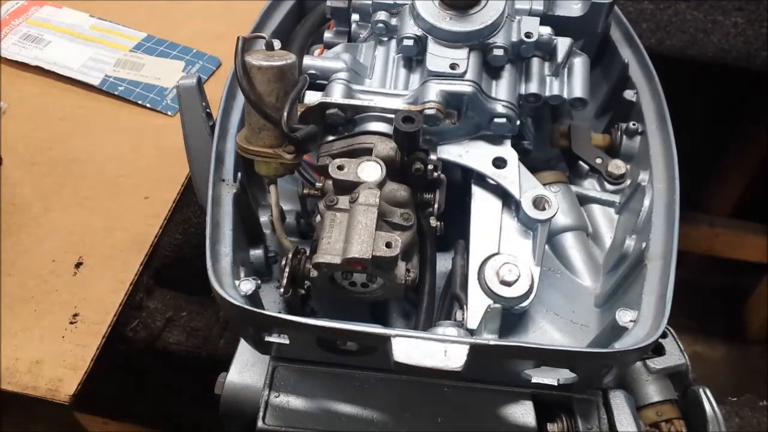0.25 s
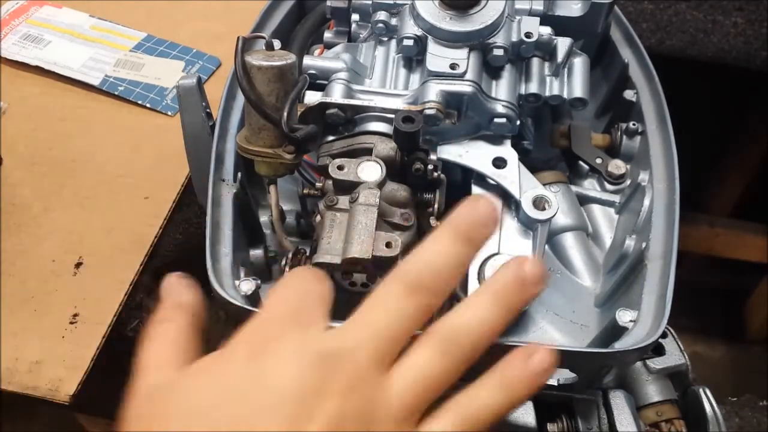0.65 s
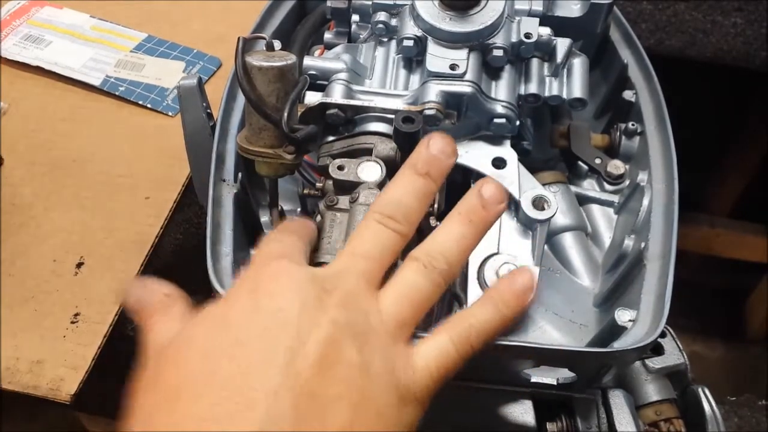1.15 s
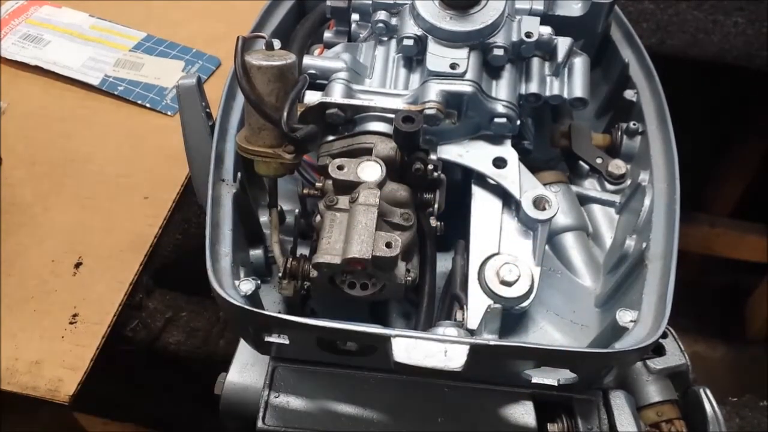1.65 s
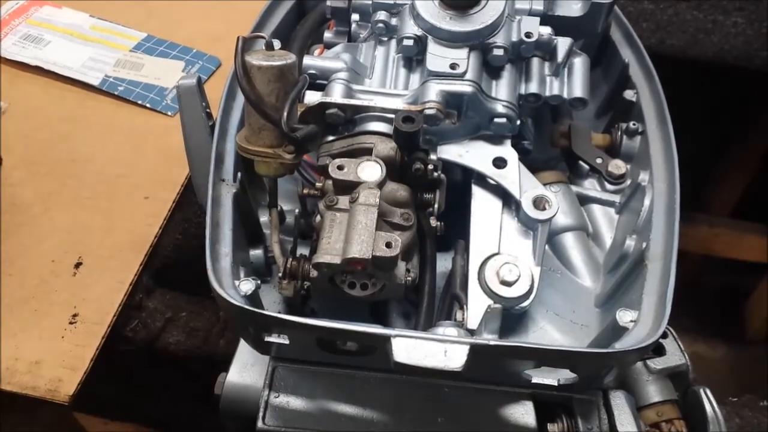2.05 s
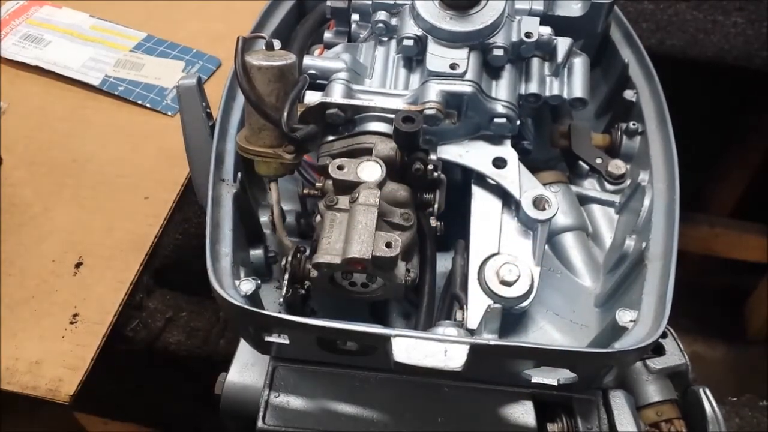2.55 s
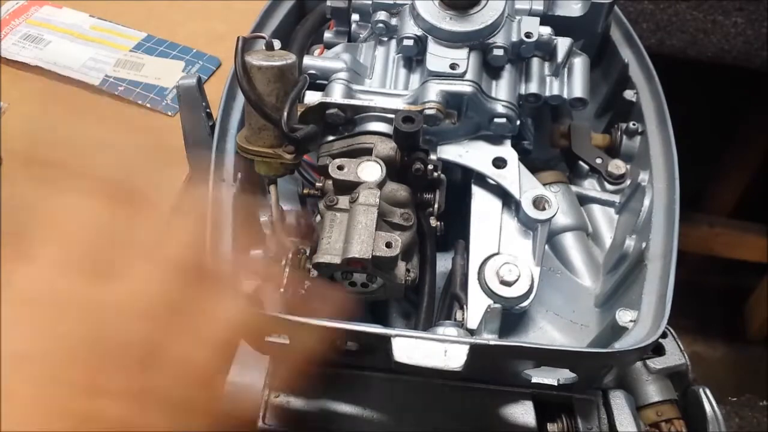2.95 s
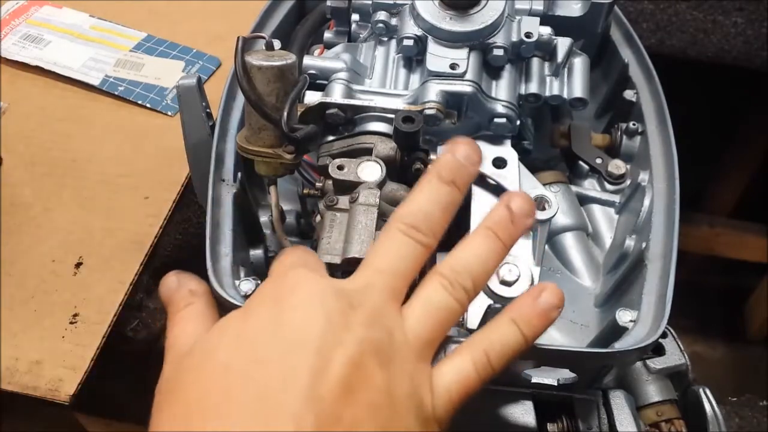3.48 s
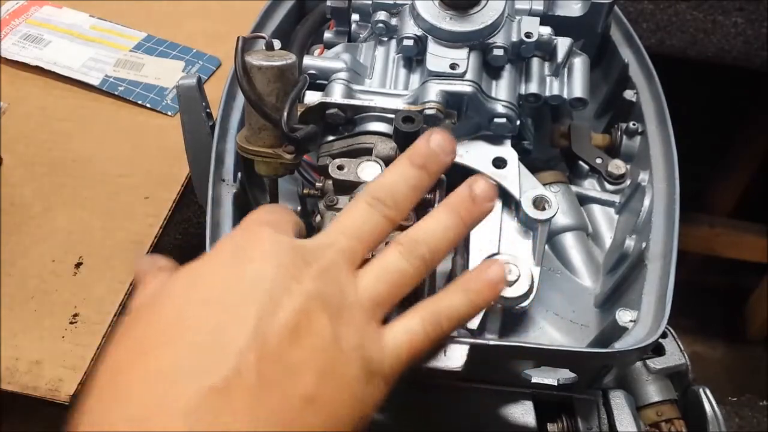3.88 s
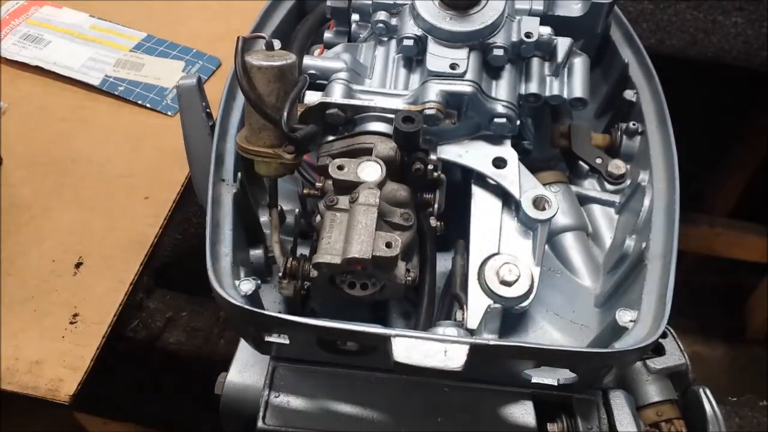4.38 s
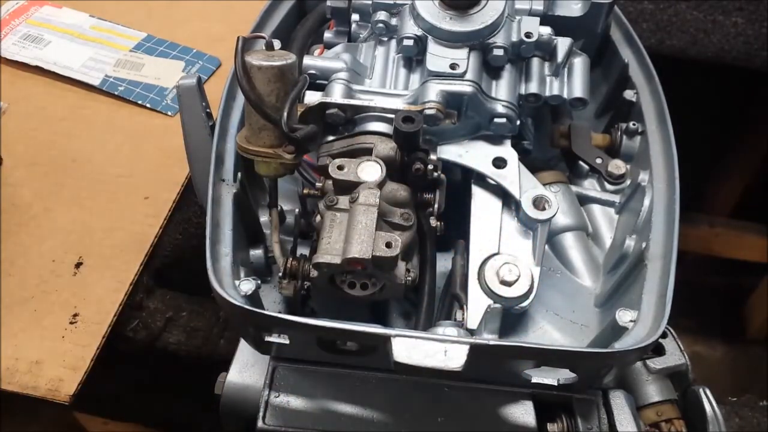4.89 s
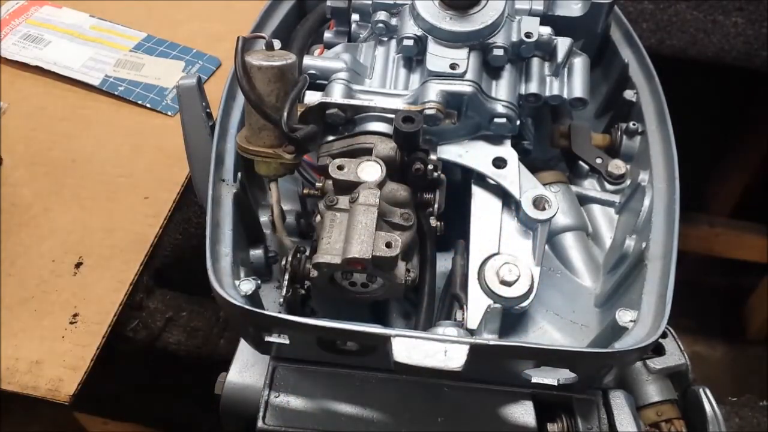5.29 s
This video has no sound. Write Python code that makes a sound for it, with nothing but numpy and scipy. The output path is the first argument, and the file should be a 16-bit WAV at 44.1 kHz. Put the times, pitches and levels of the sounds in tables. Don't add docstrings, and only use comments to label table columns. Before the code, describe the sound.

Close to an open outboard motor in a workshop, the ringing tail of a metal clack opens the scene. A lever is flicked out and snaps back in two lighter clicks with a faint squeak. A loud plunger slam follows, then dull far taps, another lever pair and a final slam. Small parts tick afterwards; a distant engine, lamp hum and hiss stay very low.

```python
import sys
import numpy as np
from scipy import signal
from scipy.fft import rfft, irfft, next_fast_len
from scipy.io import wavfile
from scipy.ndimage import map_coordinates

SR = 44100
rng = np.random.default_rng(int(sys.argv[2]) if len(sys.argv) > 2 else 0)


def log_audio(samples):
    frames = np.atleast_2d(samples).T
    limited = np.clip(frames, -1, 1)
    pcm = np.round(limited * 32767).astype(np.int16)
    wavfile.write(sys.argv[1], SR, pcm)


def makeup_ratio(level_db):
    decades = np.asarray(level_db, float) / 20
    return 10 ** decades


N = 243873
LEAD = SR // 10
SPAN = N + LEAD

# (time [s], peak level [dB], scrape length [ms])
EARLY = [
    (-.032, -2.5, 5.2),
    (-.017, -24, 2.6),
    (-.007, -6, 3.1),
]
SLAM_A = [
    (2.4506, -20.5, 1.7),
    (2.452, -10, 0.5),
    (2.4529, -8.5, 1.3),
    (2.4542, -10, 1.3),
    (2.455, -15.5, 1.5),
]
SLAM_B = [
    (5.1173, -26, 1.5),
    (5.1183, -8.5, .8),
    (5.1198, -9, 1.1),
    (5.1202, -14.5, 1),
    (5.1212, -14.5, 1.04),
]
# (time [s], frame peak level [dB], plate minus frame [dB])
SHOCKS = [(0.2068, -54, -3.5), (0.96, -61, -6), (1.109, -47, -1), (2.436, -58.5, 8.5), (2.454, -46.5, -17),
          (2.674, -58, -1), (3.778, -52, -7), (3.883, -45, 0), (5.104, -59.5, 7), (5.126, -48.5, -9),
          (5.378, -55, -4)]
# (time [s], peak level [dB], scrape length [ms])
KNOCKS = [
    (.423, -58.5, 16),
    (2.9205, -42.5, 7.6),
    (2.932, -48.5, 6.9),
    (3.0, -57, 4),
    (3.4152, -50, 9),
]


def unit(x):
    return x / np.sqrt(np.mean(x ** 2) + 1e-20)


def along(points, hz):
    f, v = np.transpose(points)
    return np.interp(np.log(hz + 1), np.log(f + 1), v)


def curves(rows):
    s, *cols = np.transpose(rows)
    return [np.interp(np.arange(N) / SR, s, col) for col in cols]


def wobble(rate):
    knots = rng.standard_normal(int(N * rate / SR) + 4)
    return map_coordinates(knots, [np.arange(N) * rate / SR])


def bump(centre_s, half_s, power=2):
    return np.exp(-((np.arange(N) / SR - centre_s) / half_s) ** power)


def filtered(x, response):
    m = next_fast_len(len(x) + SR // 4)
    return irfft(rfft(x, m) * response(np.fft.rfftfreq(m, 1 / SR)), m)[:len(x)]


def resonances(peaks):
    return lambda f: sum((-1) ** k * makeup_ratio(db) * 1j * f * width / (hz * hz - f * f + 1j * f * width)
                         for k, (hz, width, db) in enumerate(peaks))


def noise(response):
    return unit(filtered(rng.standard_normal(N), response))


def strike(contacts, peaks, grit):
    out = np.zeros(SPAN + SR)
    t = np.arange(SR // 20) / SR
    body = filtered(np.r_[1., np.zeros(SR // 8)], resonances(peaks))
    for s, db, ms in contacts:
        push = grit * rng.standard_normal(len(t)) * makeup_ratio(-20 * t / (ms / 1000))
        push[0] = 1
        sound = signal.fftconvolve(push, body / abs(body).max())
        out[round(s * SR) + LEAD:][:len(sound)] += makeup_ratio(db) * sound
    return out[:SPAN]


def hardest(contacts):
    return max(contacts, key=lambda row: row[1])


def shop(x, early_db):
    # (frequency [Hz], time to fall by 60 dB [s])
    ring_times = [(300, 1), (1000, 0.52), (2500, 0.46), (4500, 0.43), (8000, 0.36), (10500, 0.14),
                  (15000, .2)]
    wet = np.zeros(SPAN + 2 * SR)
    step = SR // 4
    gap = 180
    for start in range(0, SPAN, step):
        piece = x[start:start + step]
        if piece.any():
            hz, t, z = signal.stft(rng.standard_normal(SR // 2), SR, nperseg=256)
            late = makeup_ratio(-60 * t / along(ring_times, hz)[:, None])
            early = makeup_ratio(early_db - 60 * t / 0.046)
            tail = signal.istft(z * (late + early), SR, nperseg=256)[1]
            part = signal.fftconvolve(piece, tail / np.linalg.norm(tail))
            wet[start + gap:][:len(part)] += part
    return wet[:SPAN]


def small(x, low_hz, leak_db=-30):
    thin = signal.sosfilt(signal.butter(4, low_hz, "high", fs=SR, output="sos"), x)
    return thin + makeup_ratio(leak_db) * x


def opened(usual_db, slope):
    # (time [s], hiss let through [dB])
    opening = [(0.0, -71), (0.14, -72.5), (0.42, -76.5), (0.69, -80), (0.98, -74), (1.12, -73.5),
               (2.62, -73), (2.76, -73.5), (3.56, -75), (3.97, -75), (4.16, -76), (5.13, -77.5),
               (5.27, -74.5), (5.53, -77)]
    return usual_db + slope * (curves(opening)[0] + 75.5)


def swell(events, rise_s):
    total = np.zeros(N)
    for s, db, _ in events:
        since = np.clip(np.arange(N) / SR - s, 0, None) / rise_s
        total += makeup_ratio(db) * since * np.exp(1 - since)
    return total


def air():
    # (frequency [Hz], width [Hz], level [dB])
    boom_peak = [(65.4, 9.9, 0)]
    # (frequency [Hz], level per Hz [dB])
    rumble_colour = [(12, -49.5), (25, -16.5), (50, -18), (64, -3), (86, -2.5), (129, -5.5), (160, -4),
                     (200, -10), (268, -17), (400, -30.5), (600, -65.5)]
    murmur_colour = [(150, -30.5), (250, -3.5), (421, -9), (477, -9.5), (584, -8), (982, -11), (1130, -16),
                     (2500, -27), (3250, -52), (5500, -120)]
    hiss_colour = [(700, -32), (1200, -1.5), (1700, -6.5), (2500, -7), (6050, -6), (8270, -8), (12000, -8),
                   (15500, -6.5), (15750, -65.5)]
    stir = swell(SHOCKS, rise_s=0.038)
    taps = makeup_ratio(-31.5) * swell(KNOCKS, rise_s=0.06)
    boom = makeup_ratio(opened(-63, 1.4)) * noise(resonances(boom_peak))
    rumble_level = makeup_ratio(opened(-62.5, 1.3) + 1.5 * wobble(2.8)) + makeup_ratio(-14.5) * stir
    rumble = rumble_level * noise(lambda f: makeup_ratio(along(rumble_colour, f)))
    murmur_level = makeup_ratio(opened(-70, 0.58)) + makeup_ratio(-19) * stir + taps
    murmur = murmur_level * makeup_ratio(0.8 * wobble(14)) * noise(lambda f: makeup_ratio(along(murmur_colour, f)))
    hiss_level = makeup_ratio(opened(-71, 0.91)) + makeup_ratio(-33) * stir
    hiss = hiss_level * noise(lambda f: makeup_ratio(along(hiss_colour, f)))
    return boom + rumble + murmur + hiss


def lamp():
    # (frequency [Hz], rms level [dB])
    mains = [(120, -72), (240, -78), (360, -86), (480, -84)]
    # (centre [s], half length [s], frequency [Hz], level [dB])
    whine_event = (4.6, .33, 718, -81)
    t = np.arange(N) / SR
    buzz = sum(makeup_ratio(db + 0.6 * wobble(4.2)) * np.sin(2 * np.pi * hz * t) for hz, db in mains)
    s, half, hz, db = whine_event
    whine = makeup_ratio(db + 2.2 * wobble(9.8)) * bump(s, half, power=4) * np.sin(2 * np.pi * hz * t)
    return np.sqrt(2) * (makeup_ratio(opened(0.17, 1.3)) * buzz + whine)


def far_engine():
    # (time [s], frequency [Hz], level [dB])
    course = [(0, 133.6, -56), (.28, 134.3, -56.5), (.42, 132.2, -67.5), (.9, 131.8, -73.5),
              (1.16, 132, -56), (1.6, 130.6, -57.5), (2.5, 129.5, -57), (2.75, 127.4, -69), (3, 122, -63),
              (3.6, 120.1, -65), (3.95, 119.8, -62), (4.85, 118.7, -73), (5.1, 119, -75.5),
              (5.53, 120.3, -72)]
    hz, db = curves(course)
    turn = 2 * np.pi * np.cumsum(hz + 0.3 * wobble(4)) / SR
    first = makeup_ratio(db + 0.89 * wobble(1.9)) * np.sin(turn)
    second = makeup_ratio(db - 21 + 2.5 * wobble(15)) * np.sin(2 * turn)
    return np.sqrt(2) * (first + second)


def bench():
    # (centre [s], half length [s], level [dB])
    slides = [
        (2.0, 0.061, -70.5),
        (4.5, 0.12, -69.5),
    ]
    # (frequency [Hz], width [Hz], level [dB])
    top = [(710, 160, -4), (1020, 300, -1.5)]
    level = sum(makeup_ratio(db) * bump(s, half) for s, half, db in slides)
    return level * noise(lambda f: resonances(top)(f) ** 2)


def brush():
    # (centre [s], half length [s], level [dB])
    strokes = [
        (0.73, 0.16, -76),
        (3.69, 0.073, -74.5),
        (3.21, 0.13, -79),
    ]
    # (frequency [Hz], width [Hz], level [dB])
    cloth = [(2600, 830, -2), (4700, 820, -4), (6300, 1500, -2), (7450, 230, -2)]
    level = sum(makeup_ratio(db) * bump(s, half) for s, half, db in strokes)
    return level * makeup_ratio(2 * wobble(90)) * noise(resonances(cloth))


def squeak():
    # (centre [s], half length [s], frequency [Hz], level [dB])
    squeaky_tones = [(0.76, 0.05, 1620, -78), (0.892, 0.028, 1640, -65), (.925, .012, 1610, -70),
                     (1.03, 0.025, 1620, -69), (1.033, 0.079, 2700, -68.5), (1.018, 0.042, 1200, -70),
                     (1.228, 0.02, 1640, -67.5), (1.227, .03, 2700, -71), (3.385, .02, 1630, -83),
                     (3.46, 0.023, 1580, -75), (3.5, 0.01, 6500, -74), (3.65, .01, 1640, -76),
                     (3.69, 0.02, 1640, -71), (3.2, 0.029, 1640, -65), (3.725, 0.047, 2900, -75.5),
                     (3.74, 0.023, 6400, -70), (3.794, 0.04, 1300, -63)]
    strokes = np.zeros(N)
    for s, half, hz, db in squeaky_tones:
        narrow = resonances([(hz, 0.05 * hz, 0)])
        strokes += makeup_ratio(db) * bump(s, half) * noise(lambda f: narrow(f) ** 2)
    return makeup_ratio(0.98 * wobble(54)) * strokes


def stand():
    # (frequency [Hz], width [Hz], level [dB])
    frame = [(160, 8.4, -4), (271, 4.034, 3), (345, 58, -17.5), (420, 62, -16)]
    plate = [(653.7, 9, -1), (692, 18, -2.5), (763, 61, -11)]
    frame_hum = strike([(s, db, 6) for s, db, _ in SHOCKS], frame, grit=0.05)
    plate_hum = strike([(s, db + plate_db, 8) for s, db, plate_db in SHOCKS], plate, grit=0.41)
    return makeup_ratio(-0.5) * frame_hum + makeup_ratio(-4.5) * plate_hum


def rattle():
    # (time [s], peak level [dB], pitch [Hz], scrape length [ms], pitch over the shared resonances [dB])
    settling = [(0.2048, -38.5, 7160, 1.6, 4), (.206, -44, 2080, 3, 9), (0.2095, -42, 4350, 4.4, 12),
                (0.2164, -35.5, 6850, 3.6, 13), (0.2206, -42.5, 5030, 5.5, 3), (0.2575, -48, 7500, 2, 2),
                (0.844, -57, 4500, 2.8, 8), (1.072, -62, 4200, 2.5, 6), (1.3317, -52, 7090, 4.4, 7),
                (2.2004, -54, 3467, 2.6, 1), (2.6632, -38, 6200, 3.1, 3), (2.6675, -37.5, 2000, 3.4, 1.5),
                (2.6737, -40, 4360, 3.7, 12), (2.6787, -39, 6930, 3.5, 5), (2.68, -46, 2600, 3, 5),
                (2.6864, -50, 5300, 3, 9), (3.2004, -60.5, 7300, 3.5, 9), (3.651, -54, 5200, 3.3, 3),
                (3.8325, -39, 6800, 3.3, 4), (4.0948, -50, 7070, 3.1, 7.5), (4.4643, -55.5, 2207, 4, 4.5),
                (5.3715, -51, 2890, 2, 8), (5.3756, -41, 2540, 3, 9.5), (5.377, -40, 5700, 3, 10),
                (5.3874, -46, 6800, 4.2, 3), (5.396, -55, 2120, 3, 4)]
    travel = [
        (2.4245, -50, 2000, 5.4, 7),
        (2.433, -38, 4230, 3.3, -0.5),
        (2.4363, -37, 6514, 3.1, 12),
        (2.443, -34.5, 1848, 6.7, 13),
        (2.447, -42, 7293, 4, 4.5),
        (5.1007, -47, 6300, 4, 6.5),
        (5.1079, -41, 1890, 6.3, 13.5),
    ]
    # (frequency [Hz], width [Hz], level [dB])
    loose = [(1152, 499, -7), (2600, 1700, -2.5), (4350, 560, -11), (5840, 560, -4.5), (7000, 397, -5),
             (9000, 1998, -20)]
    wood = [(650, 130, -2.5), (1070, 280, -3.5), (1750, 300, -9)]
    rough = 0.45
    taps = makeup_ratio(-10.0) * strike(KNOCKS, wood, rough)
    for s, db, hz, ms, pure_db in settling + travel:
        taps += strike([(s, db - 9, 1.5 * ms)], loose + [(hz, 350, pure_db)], rough)
    return small(taps + makeup_ratio(-7.5) * shop(taps, early_db=13), low_hz=499.6)


def intake():
    # (time [s], level [dB], extra on the lower mode [dB])
    thuds = [
        (0.9531, -44, -6),
        (2.4524, -17, 5.5),
        (3.76, -35.5, 1.5),
        (3.8314, -49, -14),
        (5.119, -23, 0),
    ]
    # (frequency [Hz], width [Hz], level [dB])
    hollow = [(975, 160, -4.5), (1223, 27, 2)]
    (hz, width, level_db), upper = hollow
    answer = np.zeros(SPAN)
    for s, db, extra_db in thuds:
        answer += strike([(s, db, 1)], [(hz, width, level_db + extra_db), upper], grit=0)
    return small(answer, low_hz=710)


def linkage():
    # (time [s], peak level [dB], scrape length [ms])
    out = [
        (0.952, -29.5, 6.7),
        (0.954, -25.5, 2.1),
        (0.963, -41, 3.3),
        (0.966, -38, 4),
    ]
    back = [
        (1.1073, -25.5, 1.8),
        (1.1105, -28, 2.9),
        (1.1124, -51, 2.5),
        (1.116, -51, 6.6),
        (1.124, -46.5, 8.6),
    ]
    out_again = [
        (3.7584, -28.5, 1.6),
        (3.7597, -29, 2),
        (3.7652, -54, 3.4),
        (3.7696, -49.5, 17),
        (3.83, -57, 6),
    ]
    back_again = [
        (3.8847, -24, 1.7),
        (3.8866, -25.5, 2.3),
        (3.896, -37, 3.5),
        (3.902, -50, 8.8),
    ]
    # (frequency [Hz], width [Hz], level [dB])
    stop_out = [(1216, 104, 0), (1610, 140, -6), (2590, 174, 1), (2820, 130, -0.5), (4500, 520, -8),
                (6200, 2200, -18), (7440, 320, -14.5), (8800, 600, -24.5), (12300, 1500, -27)]
    stop_back = [(763, 32, 4.5), (1170, 160, -11.5), (1890, 270, -12), (2700, 490, -1.5),
                 (3000, 1440, -11.5), (4570, 380, -10.5), (5900, 1070, -14.5), (7640, 1500, -22.5),
                 (13000, 2500, -29)]
    stop_out_again = [(1005, 200, 2.5), (1190, 132, 4.5), (1720, 260, -13), (2640, 210, -0.5),
                      (3500, 300, -21.5), (4500, 420, -11.5), (6000, 400, -19), (6800, 400, -18),
                      (7800, 340, -15.5), (12500, 3300, -39)]
    stop_back_again = [(710, 67, 3), (1045, 390, -13), (2314, 380, -3), (2770, 260, 4.5), (3330, 430, -7),
                       (4500, 350, -12), (5300, 380, -9), (6300, 950, -11.5), (7900, 1000, -27),
                       (12000, 2500, -34)]
    bracket = [(665, 20, 13), (1320, 350, 3.5), (2740, 510, 1), (4500, 2000, -4), (6950, 3000, -6)]
    stops = strike(out, stop_out, grit=0.18) + strike(out_again, stop_out_again, grit=0.28)
    stops += strike(back, stop_back, grit=0.29) + strike(back_again, stop_back_again, grit=0.34)
    lasting = shop(strike(out + out_again + back + back_again, bracket, grit=0.21), early_db=5.5)
    return small(makeup_ratio(-1.5) * stops + makeup_ratio(-11.5) * lasting, low_hz=690)


def pan():
    # (time to fall by 60 dB [s], level after first, second and third pull-in [dB])
    mode_rows = [(.3, -16, -7, -11), (0.4, -18.5, -10.5, -12), (.24, -22, -8, -16.5), (0.19, -17, -9, -25),
                 (.33, -20, -20, -14.5), (0.33, -8, -3.5, -6), (0.21, -3, -6, -14), (0.26, -9, -9.5, -13.5),
                 (.33, -14, -12, -10), (.29, -12, -16, -9), (.4, -8.5, -7, -13), (.33, -10, -8, -12),
                 (0.23, -13, -15.5, -3.5), (0.36, -11, -13.5, -14), (0.27, -17, -4, -13),
                 (.28, -18, -12, -15), (.22, -15, -6.5, -12), (.2, -18, -7, -18), (0.22, -13, -15, -19.5),
                 (.23, -8, -8, -13), (.23, -4, -14, -5), (0.24, -12, -9.5, -7.5), (.25, -2.5, 0.5, -4),
                 (0.17, -13, -7, -8)]
    mode_hz = [965, 1217, 1637, 2557, 2837, 3844, 3861, 3990, 4024, 4334, 4613, 4692, 4788, 4919, 5480,
               5995, 6350, 6939, 7149, 7617, 7930, 8128, 8274, 8506]
    beat, slip_rad = 0.3, 0.016
    ring = np.zeros(SPAN + SR)
    t = np.arange(SR // 2) / SR
    for k, contacts in enumerate((EARLY, SLAM_A, SLAM_B)):
        s, db, _ = hardest(contacts)
        start = rng.uniform(0, 2 * np.pi, (len(mode_rows), 1))
        slip = start + slip_rad * np.cumsum(rng.standard_normal((len(mode_rows), len(t))), axis=1)
        fade = np.array([makeup_ratio(row[k + 1] - 60 * t / row[0]) for row in mode_rows])
        shiver = 1 + beat * np.sin(2 * slip)
        modes = np.sum(fade * shiver * np.sin(2 * np.pi * np.outer(mode_hz, t) + slip), axis=0)
        build_up = 1 - np.exp(-t / 0.0031)
        ring[round(s * SR) + LEAD:][:len(t)] += makeup_ratio(db - 29.0) * modes * build_up
    return ring[:SPAN]


def plunger():
    # (frequency [Hz], width [Hz], level [dB])
    seat_a = [(954, 300, -9.5), (1220, 150, -11), (1567, 201, -7), (2079, 250, -10), (2620, 430, -8.5),
              (4417, 400, -0.5), (5438, 366, 0), (6480, 220, 1.5), (7070, 1700, -3.5), (7420, 240, 4.5),
              (8000, 510, -1), (9150, 410, -5), (10730, 300, -26.5), (11610, 489, -25.5), (13050, 440, -12),
              (14880, 520, -14)]
    seat_b = [(960, 180, -18.5), (1196, 340, -16), (1461, 125, -8), (2825, 260, -6.5), (4064, 204, -3.5),
              (4350, 290, 2), (4810, 840, -4.5), (6670, 320, -15.5), (7090, 210, -9), (8150, 460, -5),
              (8930, 200, -9), (10400, 360, -36.5), (12800, 740, -20), (14500, 260, -15.5)]
    housing_a = [(990, 310, -2.5), (1624, 201, -4.5), (2490, 520, -9.5), (3840, 182, -8.5), (4516, 270, 1),
                 (5390, 150, 3.5), (6320, 360, -1.5), (7360, 600, -6.5), (8460, 140, 1.5),
                 (13050, 2500, -24.5)]
    housing_b = [(1080, 500, -4), (1730, 100, -21), (2640, 880, -10.5), (3910, 160, 3.5), (4270, 300, 2),
                 (4870, 260, 6), (5440, 500, -4.5), (6400, 365, -2.5), (7520, 480, -5.5), (8410, 500, 1),
                 (12600, 1900, -12)]
    # (time [s], peak level [dB], scrape length [ms])
    rebound_a = [
        (2.4586, -24.5, 1.6),
        (2.4672, -27, 5.6),
        (2.4765, -33.5, 4),
    ]
    rebound_b = [
        (5.1235, -22, 2.6),
        (5.1262, -29, 2.1),
        (5.1305, -27, 2.1),
        (5.133, -25, 2.8),
        (5.138, -33.5, 3.8),
    ]
    dull_a = [peak for peak in seat_a if peak[0] < 10000]
    dull_b = [peak for peak in seat_b if peak[0] < 10000]
    slams = strike(SLAM_A, seat_a, grit=0.38) + strike(EARLY + SLAM_B, seat_b, grit=0.35)
    slams += strike(rebound_a, dull_a, grit=0.36) + strike(rebound_b, dull_b, grit=0.37)
    housing = makeup_ratio(5.5) * strike([hardest(SLAM_A)], housing_a, grit=0)
    housing += makeup_ratio(0.5) * strike([hardest(EARLY)], housing_b, grit=0)
    housing += makeup_ratio(3.0) * strike([hardest(SLAM_B)], housing_b, grit=0)
    sound = makeup_ratio(-1.5) * slams + makeup_ratio(-8.5) * shop(housing, early_db=2.0) + pan()
    return small(sound, low_hz=750, leak_db=-23.5)


def scene():
    port = signal.butter(6, 15300, fs=SR, output="sos")
    metal = signal.sosfilt(port, stand() + rattle() + intake() + linkage() + plunger())
    background = air() + lamp() + far_engine() + bench() + brush()
    return (background + squeak() + metal[LEAD:])[None]


def roll_off(x):
    return signal.sosfilt(signal.butter(12, 16850, fs=SR, output="sos"), x)


def record(dry):
    kept = filtered(dry[0], lambda hz: hz < 16800)
    return roll_off(kept[None])


dry = scene()
out = record(dry)
log_audio(out)
```